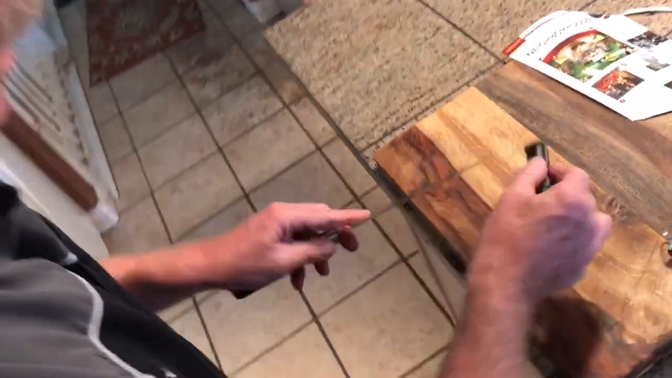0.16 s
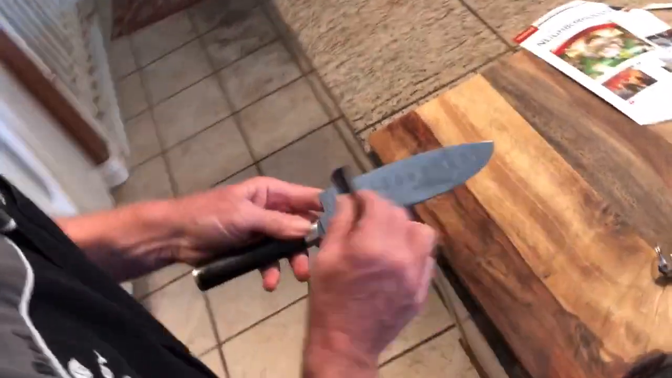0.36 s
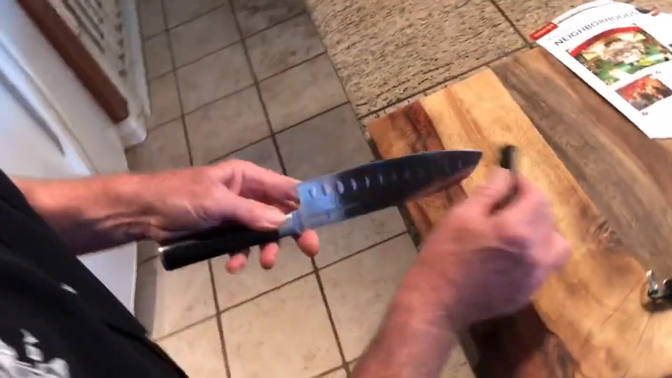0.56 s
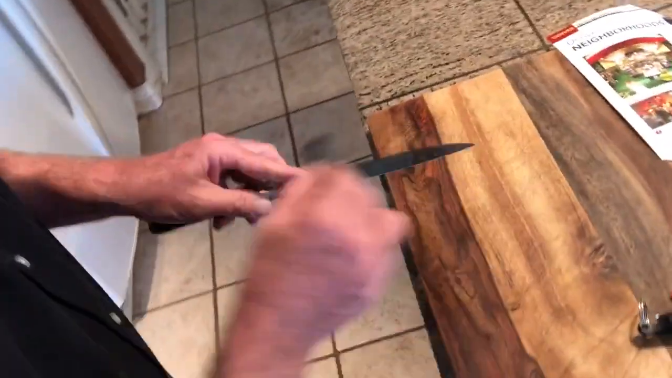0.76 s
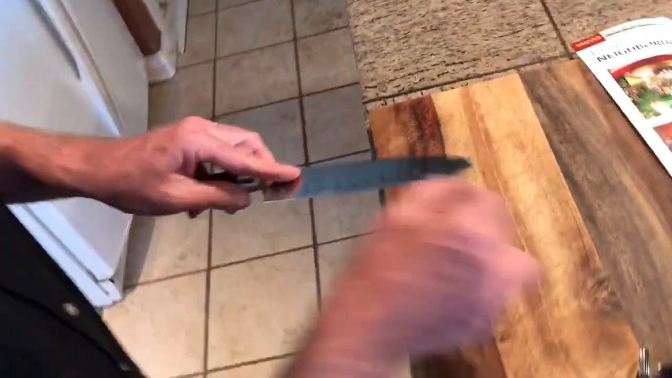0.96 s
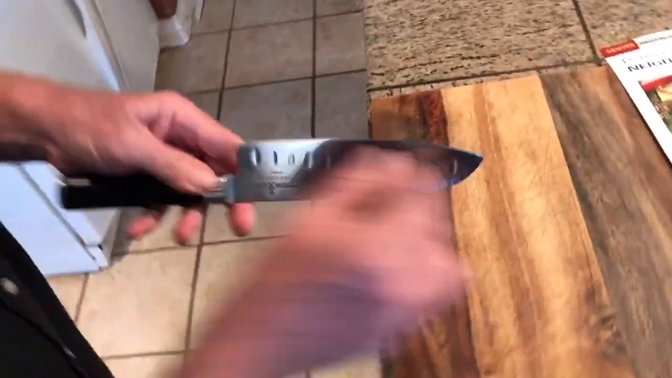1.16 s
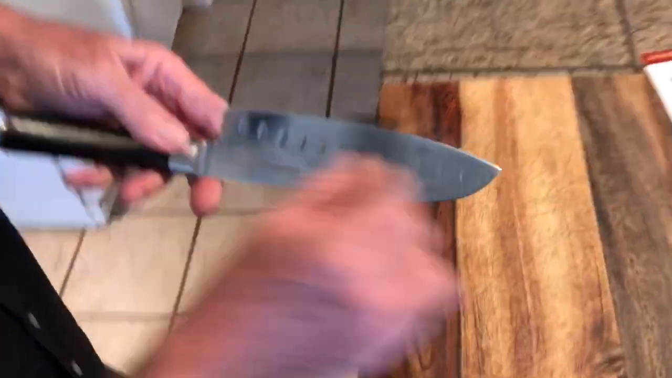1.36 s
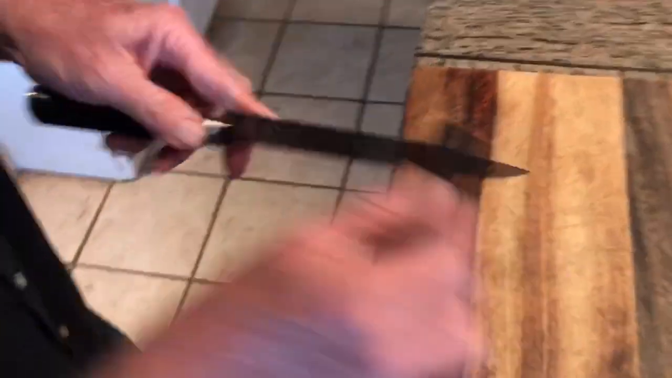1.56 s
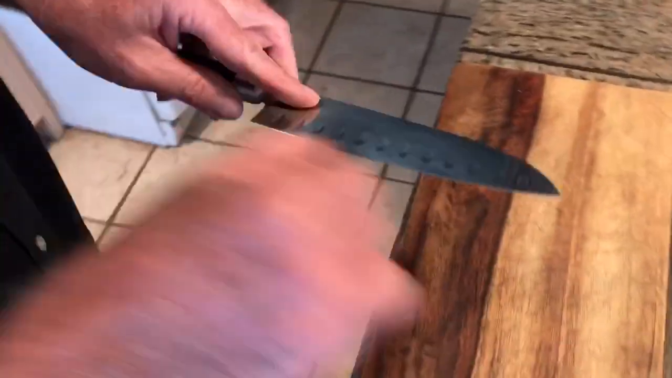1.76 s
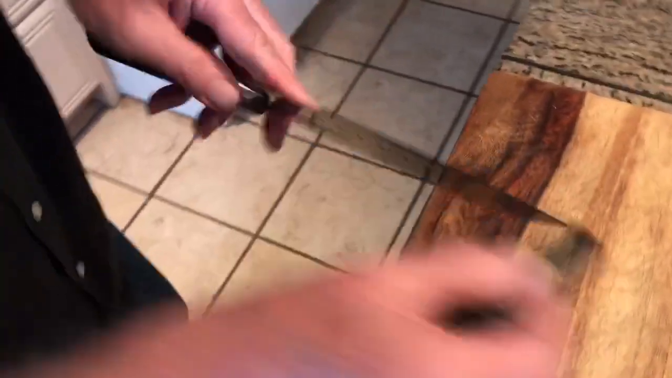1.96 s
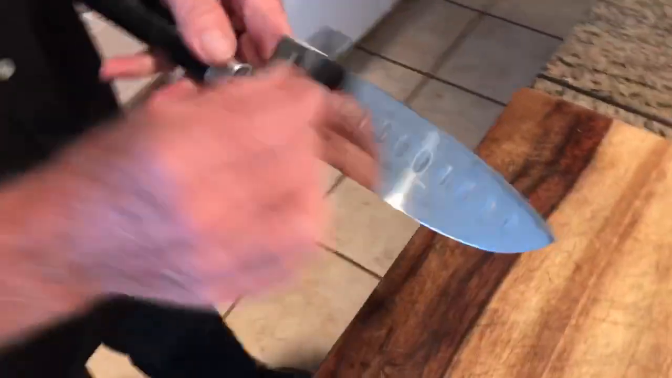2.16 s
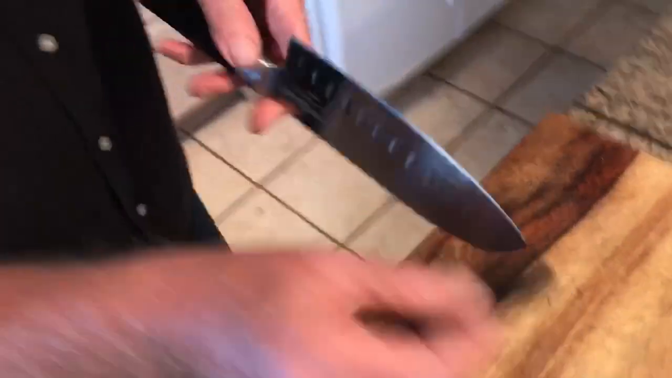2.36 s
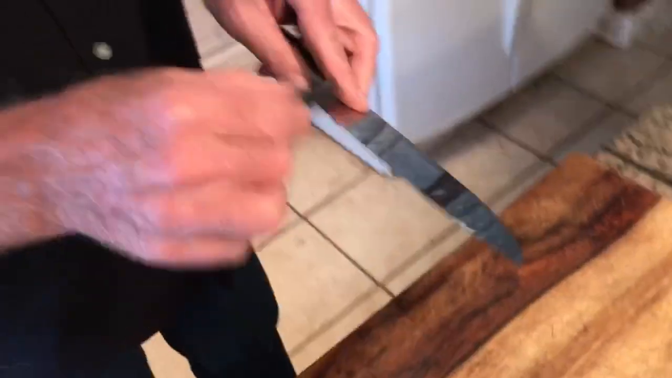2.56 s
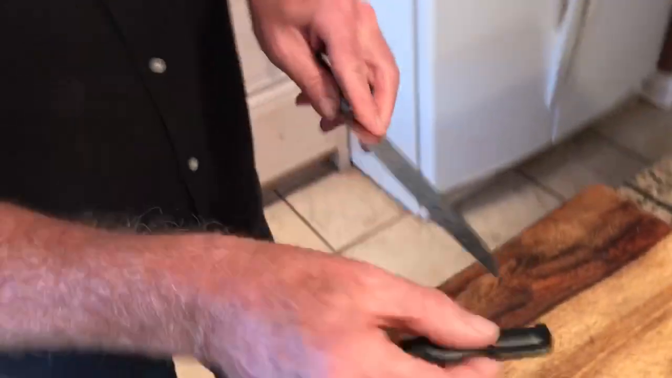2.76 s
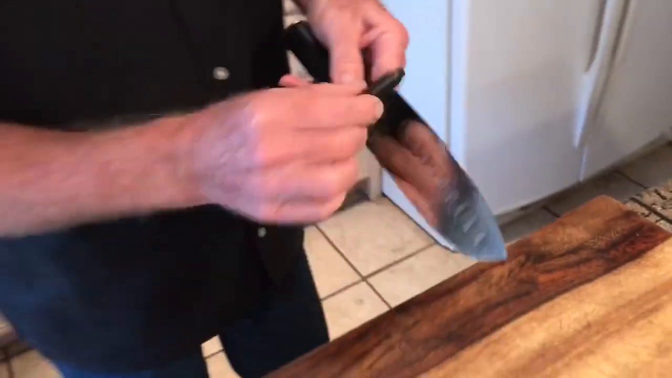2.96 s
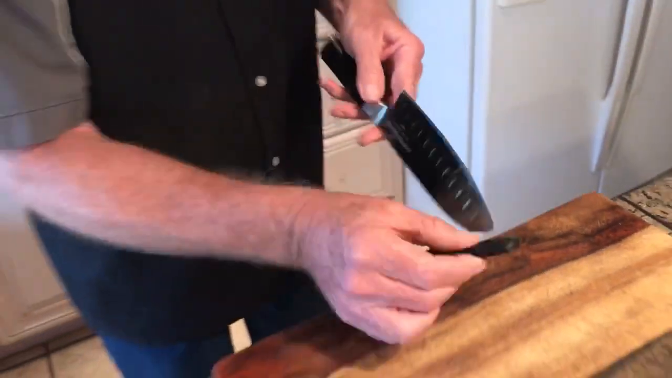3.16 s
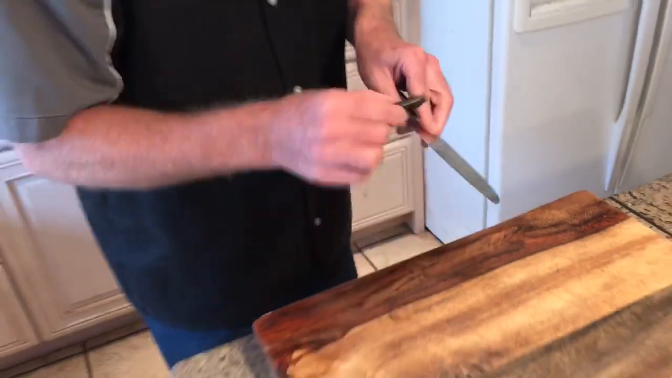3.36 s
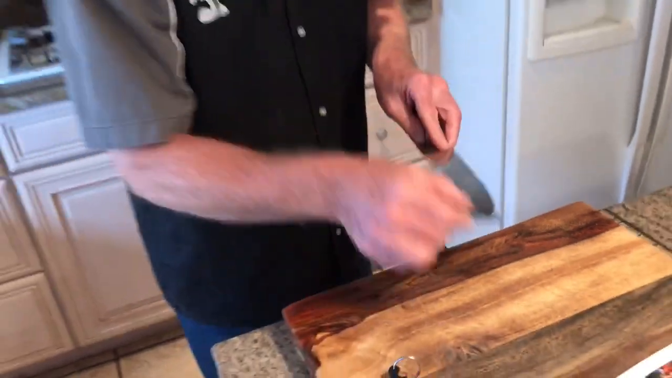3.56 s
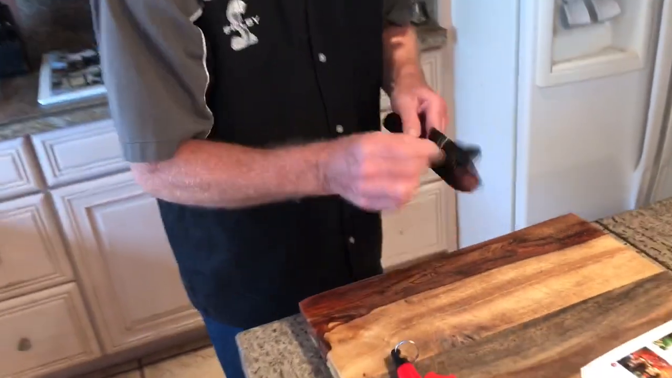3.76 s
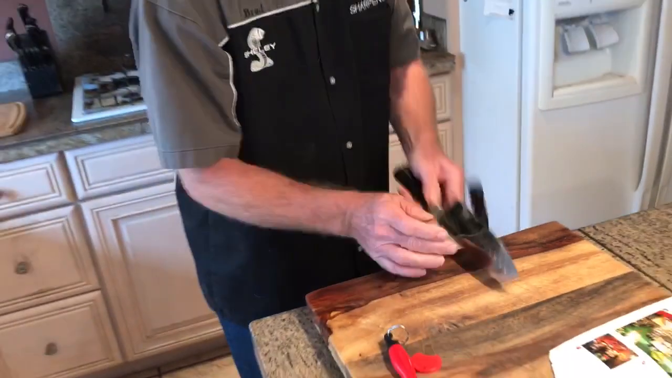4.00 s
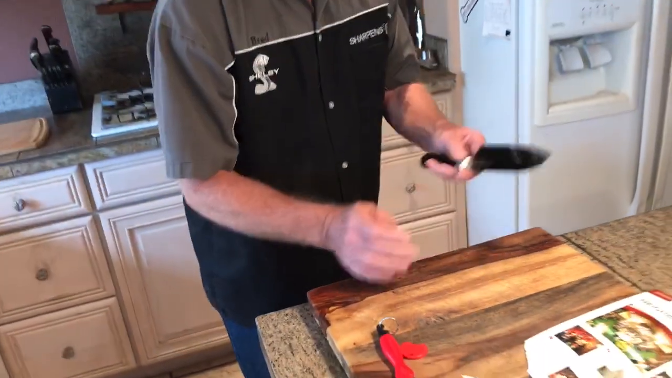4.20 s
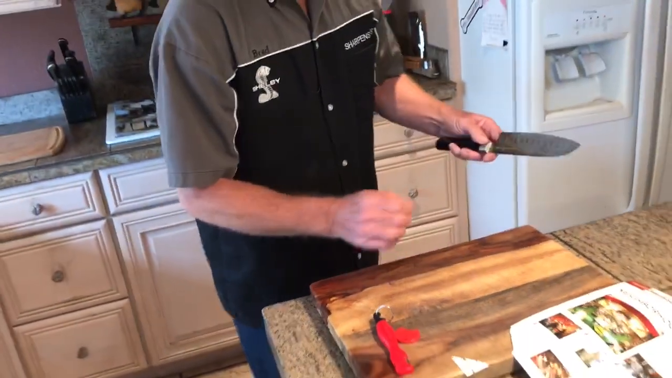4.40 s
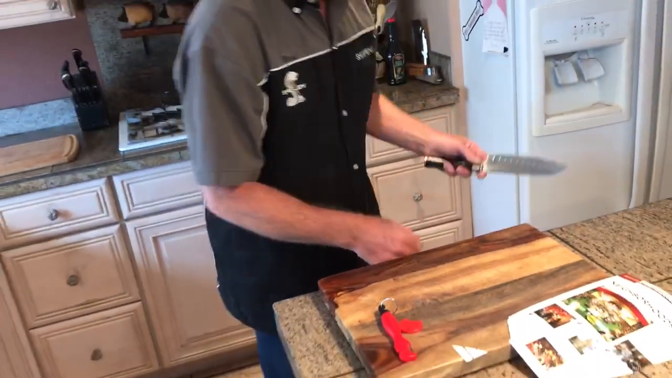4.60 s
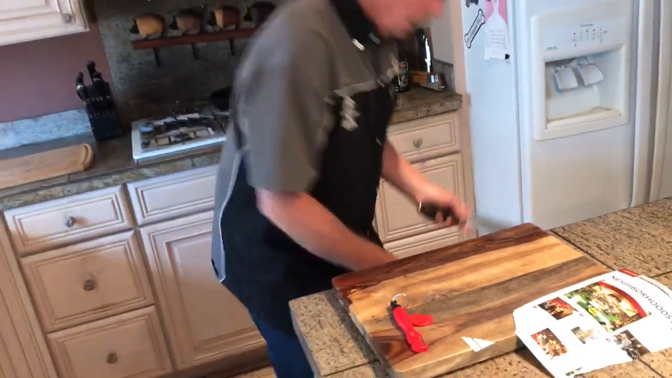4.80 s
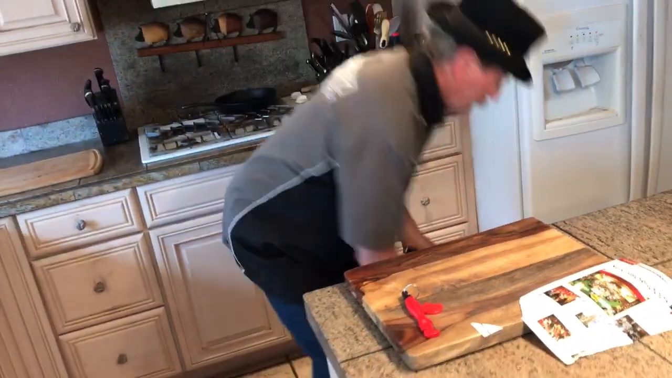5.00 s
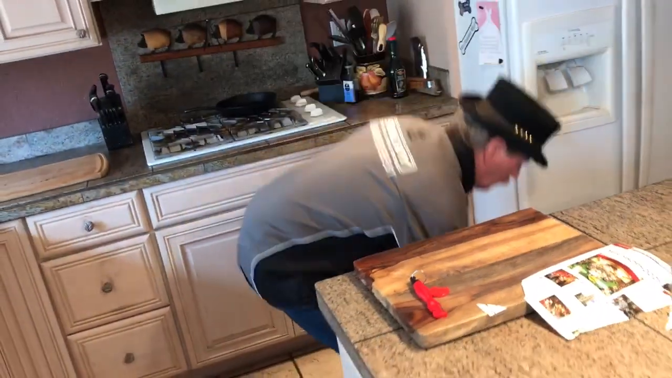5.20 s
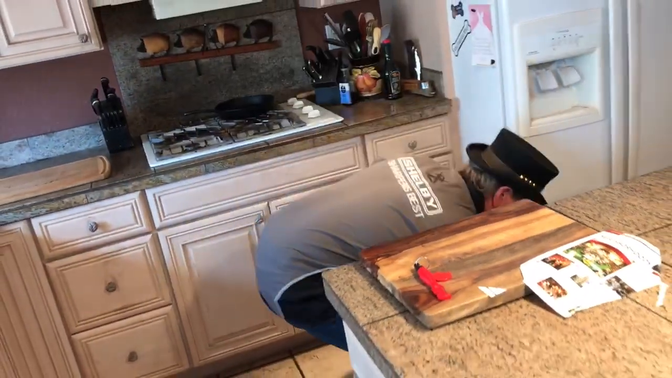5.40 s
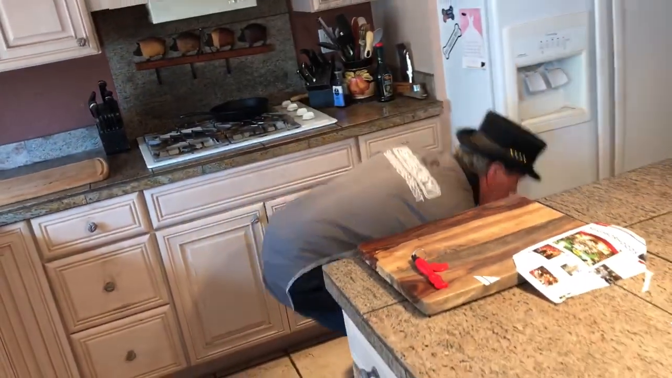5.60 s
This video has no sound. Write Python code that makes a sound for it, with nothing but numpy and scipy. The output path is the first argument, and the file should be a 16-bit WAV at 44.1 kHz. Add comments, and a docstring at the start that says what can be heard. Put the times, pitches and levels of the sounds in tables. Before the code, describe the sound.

Close microphone on a thin steel blade: crisp clicks, short dry hissing scrapes and faint glassy ringing, repeated rhythmically over soft low room air and a weak appliance hum. The strokes end in fast metallic ticks; then a small hard tool strikes tile, farther off with a short room echo, bounces a few times, and is handled quietly as clothing rustles.

```python
"""A scrape along a steel kitchen knife, over a quiet kitchen's air and hum: a small hand sharpener is flicked
along the blade. It lands with a click, scrapes towards the tip and leaves the blade ringing; then it rattles,
drops to the tiled floor, bounces and is picked up. Noise pushes and blows drive moving blade modes; decaying
sines ring on; thuds and noise-driven tool modes make the fall; a short noise tail makes the echo."""
import sys
import numpy as np
from scipy import signal
from scipy.fft import rfft, irfft, next_fast_len
from scipy.io import wavfile
from scipy.ndimage import map_coordinates

SR = 44100
rng = np.random.default_rng(int(sys.argv[2]) if len(sys.argv) > 2 else 0)


def persist_wave(psi):
    """Save psi, clipped to +-1, as 16-bit WAV."""
    counts = np.round(np.clip(psi, -1, 1) * 32767).astype(np.int16)
    wavfile.write(sys.argv[1], SR, np.atleast_2d(counts).T)


N = 248917
TIME_S = np.arange(N) / SR

# All levels and shares are relative unless a column says otherwise.
# Air colour: freq_hz, density_db
AIR_COLOUR = [(12, -38), (20, -13), (77, -0.5), (210, -6), (293, -10.5), (642, -20.5), (1260, -17.5),
              (1370, -23), (1570, -17.5), (2320, -23), (3160, -20), (4940, -27.5), (9670, -28.5),
              (16000, -40)]
# Appliance hum partials: freq_hz, level_db
HUM_PARTIALS = [(48.4, -73.5), (96.9, -74), (199.2, -74.5)]
# Echo decay: freq_hz, t60_s
ECHO_DECAY = [(200, .5), (2000, 0.3), (8000, 0.24), (15000, 0.17)]
# Treble dip of the whole sound: centre_hz, width_hz, dip_db
TREBLE_DIP = (10400, 330, -6)
# Clothes while bending down: time_s, level_db
RUSTLE_LEVEL = [(4.75, -30), (4.784, -51.5), (4.994, -53), (5.022, -48.5), (5.406, -56.5), (5.448, -51.5),
                (5.462, -42.5), (5.528, -54.5), (5.538, -62), (5.64, -60.5)]
# Cloth colour: freq_hz, density_db
CLOTH_COLOUR = [(180, -52), (300, -9), (870, -2.5), (946, -3), (4160, -5), (14200, -12), (16000, -7.5)]
# Dull bumps near the cutting board: start_s, level_db, top_share_db, fall_db_per_ms
BOARD_BUMPS = [(2.021, -31, -20.5, 1.5), (1.6, -46.5, -20, 1.0), (2.048, -44, 0.5, 1.2)]
# Loose tool on blade, tiles and in the hand: start_s, level_db, top_share_db, fall_db_per_ms, insert_share_db
TOOL_KNOCKS = [(3.825, -26.5, 23.5, 2, -27.5), (3.934, -29.5, 7, 1.4, -37), (4.383, -7.5, -18, 1.34, -44),
               (4.389, -5, 4.5, 0.91, -31), (4.523, -28.5, 11.5, 0.5, -27.5),
               (4.527, -20.5, -5.5, 0.95, -20.5), (4.614, -24.5, -4, 0.5, -23.5),
               (4.687, -34.5, -4, 0.5, -16.5), (4.712, -18.5, 12, 0.77, -26.5),
               (4.76, -37.5, -2.5, 0.2, -14.5), (4.799, -32.5, -20, 1, -37), (4.84, -41.5, -16, 0.5, -14),
               (4.871, -30.5, -20, 2.1, -25), (5.219, -45.5, -25, 0.9, -22), (5.458, -33, -13, 0.8, -15.5),
               (5.487, -36, -10, 1, -22), (5.535, -42, -13, 0.47, -14), (5.591, -59, -8.5, 1.5, -4)]
# Resonances of the tool, handle low and metal insert high: freq_hz, width_hz, level_db
TOOL_MODES = [(613, 33.4, -6.5), (1016, 53, -8), (1357, 140, -4.5), (3750, 46, -19), (4260, 123, -11),
              (5850, 102, -11), (8200, 330, -15), (8800, 196, -21.5), (11950, 100, -16)]
# Thud colour: freq_hz, density_db
THUD_COLOUR = [(71, -44), (130, -19.5), (200, -3.5), (320, -1.5), (420, -5.5), (656, -16), (805, -0.5),
               (1260, -1), (1860, -0.5), (2530, -7), (3310, -6.5), (4780, -18.5), (13000, -26),
               (16000, -27)]
# Free blade modes, in five sets that ring together: freq_hz, level_db, t60_s, set_index
FREE_MODES = [(2950, -26, .15, 0), (3690, -24, .2, 0), (5200, -25, .15, 0), (1303, -22, .2, 0),
              (6750, -16, .5, 0), (9275, 0, .22, 0), (6296, -12, .17, 1), (12140, 0, .27, 1),
              (13730, -8, .18, 1), (15430, -8, .17, 1), (7967, 0, .6, 2), (11055, 0, .14, 3),
              (15160, -8, .12, 3), (4310, 0, .3, 4)]
# Usual balance of the five sets: level_db
SET_LEVELS_DB = [-6, -4, -15, 2, -8.5]
# Blade let free: start_s, touched_s, level_db, best_mode_hz, second_mode_hz, lead_db
FREE_RINGS = [(0, .115, -46, 11055, 4310, 12), (0.106, 0.18, -49, 4310, 11055, 15.5),
              (0.179, 0.307, -43, 9275, 4310, 4), (0.617, 0.739, -56, 9275, 7967, 7),
              (0.892, 1.059, -50, 9275, 4310, 2), (1.061, 1.306, -49.5, 12140, 11055, 14.5),
              (1.493, 1.697, -50.5, 9275, 7967, 6), (1.934, 2.114, -45, 7967, 9275, 10),
              (2.345, 2.497, -54, 12140, 7967, 5), (2.767, 2.99, -38, 7967, 12140, 13.5),
              (3.204, 3.4, -58, 11055, 9275, 12), (3.48, 3.645, -40.5, 11055, 12140, 18),
              (3.645, 3.735, -39, 9275, 11055, 17), (3.735, 3.824, -50, 9275, 7967, 7),
              (3.821, 3.94, -45.5, 4310, 12140, 16.5)]
# Scrapes: start_s, length_s, start_db, end_db, bite_db, low_share_db, top_share_db, swell_db, release_db_per_s
SCRAPES = [(0.0, 0.11, -36, -36.5, 14, -16, -3.5, 2.5, 300), (.475, 0.15, -35, -33, 1, -21, -2, -3, 500),
           (0.91, 0.086, -35, -34.5, 16.5, -21, -1.5, 7.5, 350),
           (1.058, 0.029, -36, -47, 1.5, -14.5, -5, -3, 350),
           (1.355, 0.14, -29, -33, -8, -28.5, -2, 14.5, 406),
           (1.772, .13, -25, -33.5, 6, -18.5, 0.5, 2.5, 500),
           (2.23, 0.12, -27, -33.5, -1.5, -33, 4.5, 2, 900), (2.638, 0.15, -30, -30.5, 4, -27, 5, 9, 702),
           (3.065, 0.14, -27.5, -34.5, -2.5, -25.5, 2.5, 11.5, 900),
           (3.491, 0.097, -30.5, -33, 0.5, -14, -2, 3, 332), (3.816, 0.021, -33, -37.5, 0, -13, 4, -1, 330),
           (3.966, 0.02, -39, -37, 0, -12, -4, -6, 400)]
# Blows of tool on blade: start_s, level_db, low_share_db, fall_db_per_ms, ping_hz
BLADE_CLICKS = [(0.175, -17.5, -11, 0.8, 4370), (0.2039, -24.5, -12, 0.84, 9280),
                (0.4615, -1, -14, 1.2, 3335), (0.619, -11, -7, 3.1, 7840), (0.8999, -1.5, -40, 2.3, 5182),
                (1.0601, -27, -14, 0.6, 11800), (1.0895, -19, -30, 4, 11900), (1.3449, 0, -7.5, 1, 4860),
                (1.4435, -6, -37, 17, 8400), (1.5095, -18.5, -4, 2, 9680), (1.7605, -1, -11, 2.5, 5210),
                (1.8373, -9, -20, 3, 5280), (1.8826, -15, -35, 9, 13050), (1.9373, -11.5, -11, 2, 11710),
                (2.2169, -0.5, -8.5, 1.1, 4810), (2.3583, -6, -17.5, 2, 12200),
                (2.6239, -4, -1.5, 1.7, 5120), (2.6529, -3, -38.5, 11, 7650),
                (2.8835, -14, -32.5, 3.5, 3018), (3.0537, 1.5, -11.5, 1.3, 6360),
                (3.2128, -13.5, -10.5, 1.5, 6270), (3.4802, -6, -10, 1.36, 11050),
                (3.6462, -5, -28.5, 4.5, 9000), (3.7403, -0.5, -36, 0.8, 11060),
                (3.8244, -4, -26, 1.5, 4310), (3.9568, -4, -23.5, 2, 4792), (3.9835, -22.5, -33, 2, 11500)]
# Faint grazes as the tool comes in or swings away: start_s, level_db, ping_hz
FAINT_GRAZES = [(.3694, -54, 2840), (0.426, -34.5, 8150), (0.442, -25.5, 2987), (0.7404, -30, 11600),
                (.7561, -47, 3170), (.8375, -43, 7900), (.855, -41.5, 2970), (0.877, -34.5, 11300),
                (1.257, -47, 5940), (1.299, -43.5, 11900), (1.3164, -35.5, 2880), (1.3336, -24, 4000),
                (1.663, -45, 11800), (1.7164, -45, 11800), (1.7394, -25, 7450), (2.1186, -43, 4900),
                (2.156, -38.5, 3000), (2.171, -35.5, 3090), (2.202, -24, 7100), (2.5931, -37, 11800),
                (2.612, -40.5, 2170), (2.902, -30, 2930), (3.0292, -35, 11660), (3.411, -49, 3140),
                (3.4441, -42.5, 7050), (4.0845, -38, 2850), (4.335, -47, 10000)]
# Shape shared by the grazes: low_share_db, fall_db_per_ms
GRAZE_SHAPE = (-28.5, 1.3)
# First instant of a click: freq_hz, density_db
CRACK_COLOUR = [(200, -35.5), (500, -8), (1500, -13), (4000, 2), (9000, 1), (16000, 1)]
# Blade modes damped by the tool: freq_hz, width_hz (capped in use), level_db
HELD_MODES = [(600.6, 17, -22), (2653, 100, -17), (1337, 390, -10), (1775, 246, -10.5), (3031, 390, -11),
              (3530, 190, -11), (3908, 250, -10), (4330, 30, -8.5), (4802, 80, -10), (5173, 94, -6.5),
              (5920, 240, -6.5), (6440, 53, -5), (6990, 180, -4.5), (7640, 43, -5.5), (8416, 330, -7.5),
              (9140, 270, -9.5), (9750, 310, -7.5), (11060, 240, -2.5), (11680, 170, -7.5),
              (12930, 110, -4.5), (13530, 140, -15.5), (14550, 150, -7), (14650, 170, -21),
              (14290, 200, -14.5)]
# Favoured band, climbing as the overhang shrinks: heel_hz, climb_octaves, width_octaves, gain_db
FOCUS_BAND = (3250, 3.5, 0.24, 4.5)
# Blade between tool and tip: heel_hz, tip_hz, width_hz, level_db
OVERHANG_MODE = (606, 1346, 74.5, -14.5)
# Rasp between the modes: freq_hz, density_db
GRIT_COLOUR = [(290, -71.5), (500, -39.5), (784, -17), (1840, -13), (3020, -5.5), (6330, -1.5),
               (10400, -10), (12900, -6.5), (16000, 0.5)]

AIR_DB = -61.5
FALL_HZ, FALL_DB_PER_HZ, TOP_HZ = 15750, 0.09, 16850
HANDLE_DB, HANDLE_DB_PER_DB = -29.5, 0.8  # handle drive for a 0 dB knock; growth per dB of knock
SECOND_SHARE = 0.67  # second set's share of the lead
BITE_S, SWELL_BEFORE_S, SWELL_S = 0.016, 0.02, .018  # landing decay; top swell ahead of the scrape's end
LOW_SAG_DB = 3  # heel to tip
TOP_EXTRA_RELEASE = .4  # the top lets go faster by this share
PING_DB, PING_T60_S = -11.5, .022  # level re the blow's
TOP_DB_PER_OCTAVE, EVEN_HZ = 6, 7500  # a blow that pings high is bright all through
RATTLE_S = 3.71  # from here the tool rattles in place
HELD_WIDTH_MAX_HZ = 160


def amp(db):
    """Gain of a level in dB."""
    return 10 ** (np.asarray(db) / 20)


def unit(x):
    """Scaled to rms 1."""
    return x / np.sqrt(np.mean(x ** 2) + 1e-20)


def along(points, hz):
    """Interpolate (freq_hz, value) points on a log frequency axis."""
    point_hz, values = np.transpose(points)
    return np.interp(np.log(hz + 1), np.log(point_hz + 1), values)


def wobble(knots_per_s):
    """Smooth random curve of rms 1."""
    knots = rng.standard_normal(int(N * knots_per_s / SR) + 4)
    return unit(map_coordinates(knots, [TIME_S * knots_per_s]))


def filtered(x, response):
    """Apply a gain that is a function of freq_hz."""
    size = next_fast_len(x.shape[-1] + 8192)
    spectrum = rfft(x, size) * response(np.fft.rfftfreq(size, 1 / SR))
    return irfft(spectrum, size)[..., :x.shape[-1]]


def highpassed(x, corner_hz, order):
    """Smooth fall below the corner."""
    return filtered(x, lambda hz: 1 / (1 + (corner_hz / (hz + 1)) ** order))


def hiss(colour):
    """Noise of rms 1 in the given colour."""
    return unit(filtered(rng.standard_normal(N), lambda hz: amp(along(colour, hz))))


def resonate(x, hz, width_hz):
    """Resonance of movable frequency: shift to zero, smooth, shift back; white noise keeps its power."""
    turn = np.exp(2j * np.pi * np.cumsum(hz * np.ones(N)) / SR)
    pole = np.exp(-np.pi * width_hz / SR)
    smooth = signal.lfilter([np.sqrt(2 - 2 * pole * pole)], [1, -pole], x * turn.conj())
    return np.real(turn * smooth)


def burst(start_s, level_db, fall_db_per_ms, rise_s):
    """Envelope of a blow: exponential rise, linear fall in dB."""
    t = np.arange(SR // 3) / SR
    out = np.zeros(N + SR)
    fall = amp(level_db - abs(fall_db_per_ms) * t / .001)
    out[round(start_s * SR):][:len(t)] = fall * (1 - np.exp(-t / rise_s))
    return out[:N]


def ring(start_s, modes, gains, lasts_s=.5):
    """Free decay of struck modes, stopped by a touch after lasts_s."""
    t = np.arange(SR // 2) / SR
    out = np.zeros(N + len(t))
    tones = 0
    for (hz, level_db, t60_s, *_), gain in zip(modes, gains):
        tones = tones + gain * amp(level_db - 60 * t / t60_s) * np.sin(2 * np.pi * hz * t)
    touch = amp(-3000 * np.maximum(t - lasts_s, 0))
    out[round(start_s * SR):][:len(t)] = tones * touch * (1 - np.exp(-t / 0.00096))
    return out[:N]


def room_tone():
    """Steady coloured air plus appliance hum, sines wavering in level and phase."""
    hum = 0
    for hz, level_db in HUM_PARTIALS:
        level = amp(level_db + 4.5 + 0.92 * wobble(12))
        hum = hum + level * np.sin(2 * np.pi * hz * TIME_S + 0.64 * wobble(19.0))
    return amp(AIR_DB + 0.42 * wobble(1.9)) * hiss(AIR_COLOUR) + hum


def kitchen_echo(x):
    """Noise tail whose frequencies each die at their own speed; a fresh tail every 0.4 s."""
    out, step = np.zeros(N + 2 * SR), round(.4 * SR)
    for k in range(0, N, step):
        hz, t, bins = signal.stft(rng.standard_normal(SR * 3 // 4), SR, nperseg=256)
        decay = amp(-60 * t / along(ECHO_DECAY, hz)[:, None])
        tail = signal.istft(bins * decay, SR, nperseg=256)[1]
        wet = signal.fftconvolve(x[k:k + step], tail / np.linalg.norm(tail))
        out[k + 200:][:len(wet)] += wet
    return out[:N]


def clothes():
    """Soft rustle: cloth-coloured noise with a slightly lumpy level."""
    time_s, level_db = np.transpose(RUSTLE_LEVEL)
    level_db = np.interp(TIME_S, time_s, level_db - 2, left=-120)
    return amp(level_db + 1.2 * wobble(40)) * hiss(CLOTH_COLOUR)


def thuds(rows):
    """Blows on hard surfaces: a broad thud with a crack on top."""
    low, top = np.zeros((2, N))
    for start_s, level_db, top_db, fall_db_per_ms, *_ in rows:
        low += burst(start_s, level_db - 8.0, fall_db_per_ms, 0.0013)
        top += burst(start_s, level_db + top_db - 17, 1.16 * fall_db_per_ms, 0.0043)
    thud = hiss(THUD_COLOUR)
    crack = unit(highpassed(thud, 4000, 4))
    return low * thud + top * crack


def dropped_tool():
    """Knocks thud; their chatter rings handle and insert, unevenly as the tool tumbles."""
    chatter = np.zeros((2, N))  # handle, insert
    for start_s, level_db, _, fall_db_per_ms, insert_db in TOOL_KNOCKS:
        drive_db = [[HANDLE_DB + HANDLE_DB_PER_DB * level_db], [level_db + insert_db]]
        chatter += burst(start_s, 0, 0.85 * fall_db_per_ms, 0.00051) * amp(drive_db)
    chatter = chatter * rng.standard_normal(N)
    out = thuds(TOOL_KNOCKS)
    for hz, width_hz, level_db in TOOL_MODES:
        uneven = chatter[int(hz > 2000)] * amp(3.5 * wobble(7))
        out = out + amp(level_db + 14) * resonate(uneven, hz, width_hz)
    return out


def blade_ring():
    """Free blade: where the tool leaves or strikes decides which sets of modes ring on."""
    modes = np.array(FREE_MODES)
    free_hz, sets = modes[:, 0], modes[:, 3].astype(int)

    def same_set(hz):
        """Mask of the modes in the set of the mode nearest hz."""
        return sets == sets[np.argmin(abs(free_hz - hz))]

    out = np.zeros(N)
    for start_s, touched_s, level_db, best_hz, second_hz, lead_db in FREE_RINGS:
        lead = lead_db * (same_set(best_hz) + SECOND_SHARE * same_set(second_hz))
        scatter_db = rng.normal(0, 2.6, len(FREE_MODES))
        gains = amp(level_db + np.array(SET_LEVELS_DB)[sets] + lead + scatter_db)
        out += ring(start_s, FREE_MODES, gains, touched_s - start_s)
    return out


def scrape(start_s, length_s, start_db, end_db, bite_db, low_db, top_db, swell_db, release_db_per_s):
    """Push of one scrape on the low, middle and top modes: bite, slide, release."""
    t = TIME_S - start_s
    done = np.clip(t / length_s, 0, 1)
    fade_db = release_db_per_s * np.maximum(t - length_s, 0)
    bite = bite_db * np.exp(-np.maximum(t, 0) / BITE_S)
    level = start_db + (end_db - start_db) * done + bite - fade_db
    swell = swell_db * np.exp(-((t - length_s + SWELL_BEFORE_S) / SWELL_S) ** 2)
    low = level + low_db - LOW_SAG_DB * done + 11
    top = level + top_db + swell - TOP_EXTRA_RELEASE * fade_db + 2.5
    return np.clip(t / 0.011 + 1, 0, 1) * amp([low, level, top])


def held_blade(force, place, travel):
    """Damped modes: the moving contact crosses their nodes and bends their pitch."""
    heel_hz, climb_octaves, width_octaves, gain_db = FOCUS_BAND
    focus_hz = heel_hz * 2 ** (climb_octaves * travel ** 2)
    out = 0
    for hz, width_hz, level_db in HELD_MODES:
        band = int(hz > 2500) + int(hz > 9000)
        closeness = np.exp(-(np.log2(hz / focus_hz) / width_octaves) ** 2)
        drive = force[band] * amp(gain_db * np.sqrt(travel) * closeness)
        half_waves = .11 * np.sqrt(hz)  # bending waves shorten with the root of frequency
        node = np.sin(np.pi * half_waves * place * .4 + 2 * np.pi * rng.random())
        # the stiff contact raises a mode most at its antinode
        bend = 1 + 0.033 * (node ** 2 - .5) + 0.013 * wobble(30)
        mode = resonate(drive * node, hz * bend, min(width_hz, HELD_WIDTH_MAX_HZ))
        out = out + amp(level_db - 7.0) * mode
    return out


def blade_overhang(force, travel):
    """Low resonance of the blade beyond the tool, rising as the overhang shrinks; off during the rattle."""
    heel_hz, tip_hz, width_hz, level_db = OVERHANG_MODE
    tone = resonate(force, heel_hz * (tip_hz / heel_hz) ** travel, width_hz)
    return amp(level_db) * np.sqrt(travel) * (TIME_S < RATTLE_S) * tone


def knife():
    """Grit and clicks shake the blade: held modes, overhang, rasp, pings and cracks."""
    push = np.zeros((3, N))  # low, middle, top
    place, travel, pings, snap = np.zeros((4, N))
    for start_s, length_s, *shape in SCRAPES:
        push += scrape(start_s, length_s, *shape)
        place += np.clip((TIME_S - start_s) / 0.2, 0, (length_s + .04) / .2)
        begun = TIME_S > start_s - .02
        travel[begun] = np.clip((TIME_S - start_s) / .16, 0, 1)[begun]
    push *= unit(amp(.8 * wobble(60) + 1.8 * wobble(500)))  # fine uneven grit

    grazes = [(start_s, level_db, *GRAZE_SHAPE, hz) for start_s, level_db, hz in FAINT_GRAZES]
    for start_s, level_db, low_db, fall_db_per_ms, ping_hz in BLADE_CLICKS + grazes:
        top_db = TOP_DB_PER_OCTAVE * np.log2(ping_hz / EVEN_HZ)
        blow = burst(start_s, level_db - 11.5, fall_db_per_ms, 0.001)
        push += blow * amp([[low_db + 5.0], [0], [top_db]])
        snap += burst(start_s, level_db - 15.0, 3 * fall_db_per_ms, .0001)
        # the mode struck best stands out
        pings += ring(start_s, [(ping_hz, level_db + PING_DB, PING_T60_S)], [1])
        # a hard blow lands somewhere new
        place += rng.random() * (TIME_S > start_s) * (level_db > -12)

    force = push * rng.standard_normal(N)
    grit = hiss(GRIT_COLOUR)
    grit_top = highpassed(grit, 9000, 8)
    rasp = push[1] * (grit - grit_top) + push[2] * grit_top
    blade = held_blade(force, place, travel) + blade_overhang(force[0], travel)
    blade = blade + amp(-11) * rasp + pings + snap * hiss(CRACK_COLOUR)
    return highpassed(blade, 380, 4)  # a thin blade radiates no bass


def scene():
    """Close knife; floor and bumps farther and wetter; clothes and room tone dry."""
    blade = knife() + blade_ring()
    far = dropped_tool() + thuds(BOARD_BUMPS)
    echo = kitchen_echo(amp(-13.5) * blade + amp(-4.5) * far)
    return (blade + far + echo + clothes() + room_tone())[None]


def record(dry):
    """Treble dip, then a steep fall and a hard cut at the top."""
    centre_hz, width_hz, dip_db = TREBLE_DIP

    def gain(hz):
        """Gain at freq_hz."""
        dip = dip_db * np.exp(-((hz - centre_hz) / width_hz) ** 2)
        fall = FALL_DB_PER_HZ * np.clip(hz - FALL_HZ, 0, None)
        return amp(dip - fall) * (hz < TOP_HZ)

    return filtered(dry, gain)


dry = scene()
out = record(dry)
persist_wave(out)
```